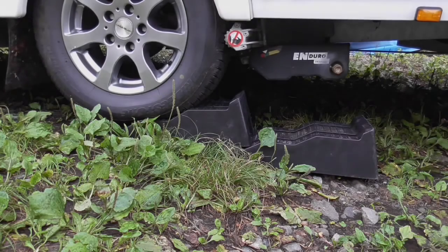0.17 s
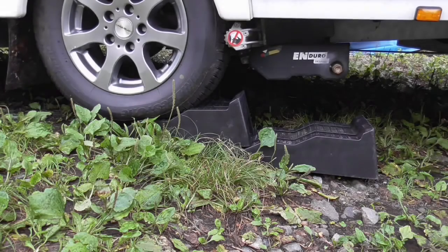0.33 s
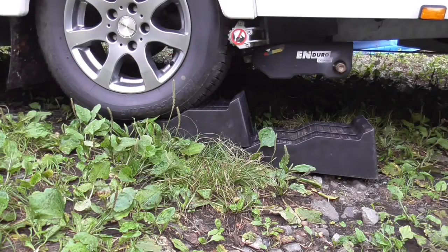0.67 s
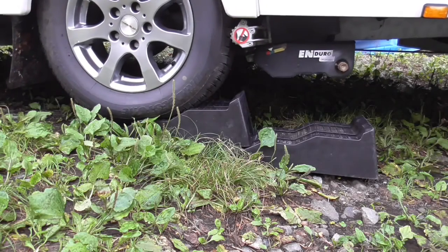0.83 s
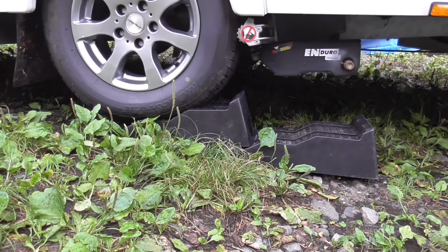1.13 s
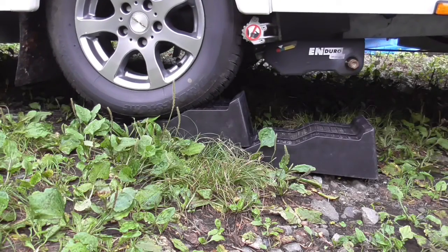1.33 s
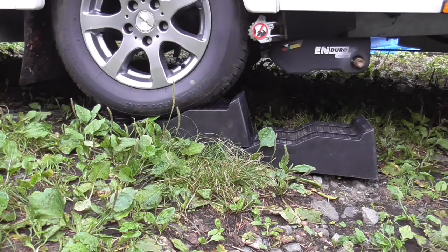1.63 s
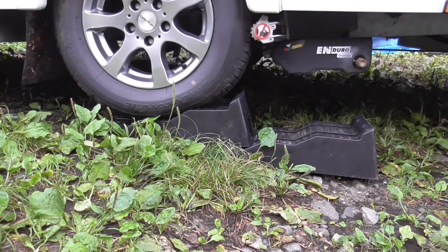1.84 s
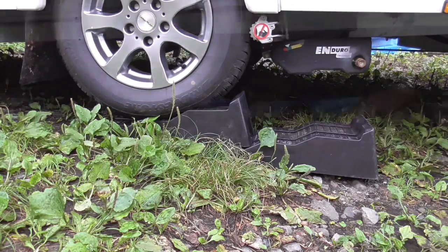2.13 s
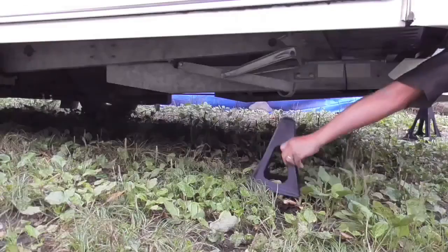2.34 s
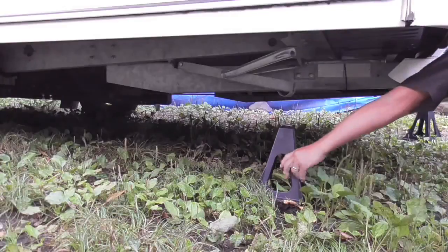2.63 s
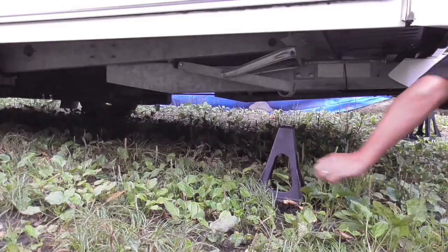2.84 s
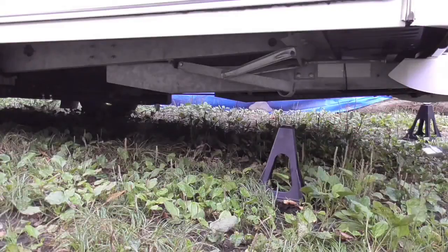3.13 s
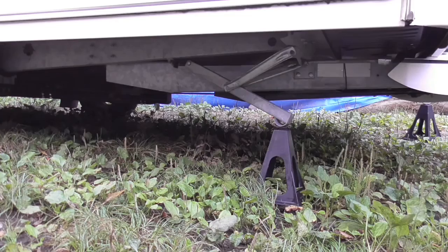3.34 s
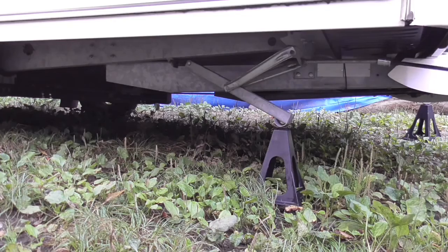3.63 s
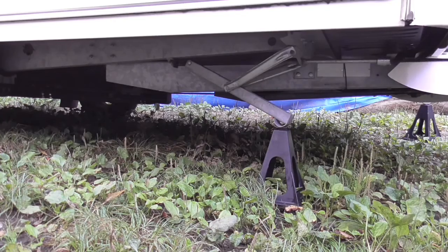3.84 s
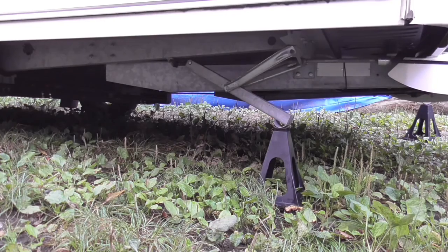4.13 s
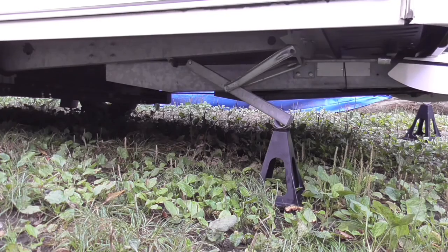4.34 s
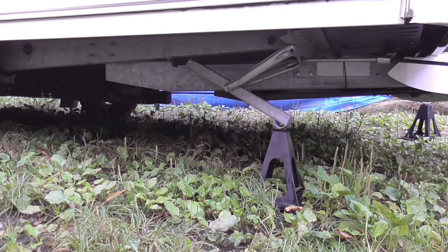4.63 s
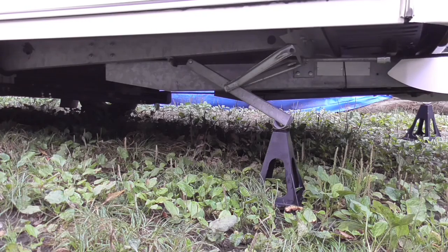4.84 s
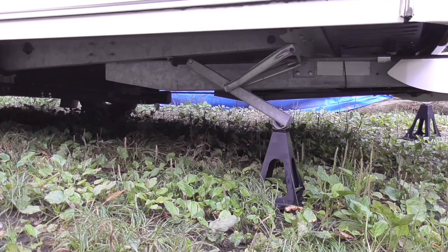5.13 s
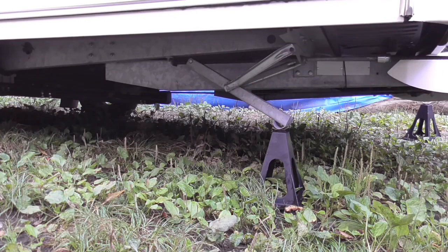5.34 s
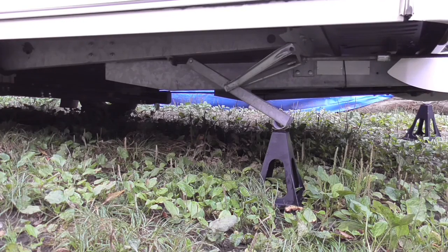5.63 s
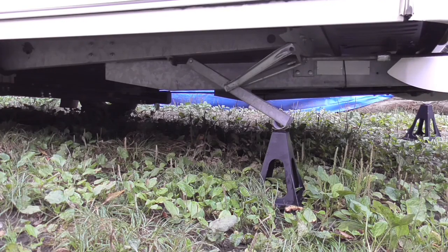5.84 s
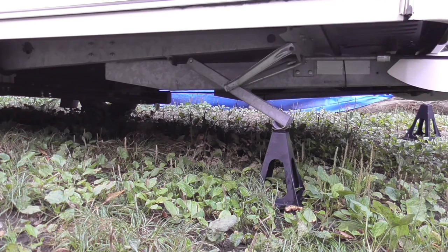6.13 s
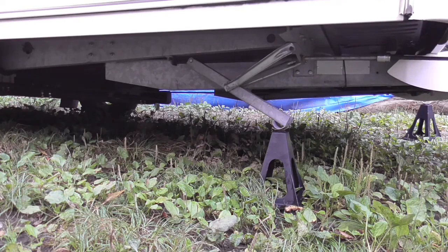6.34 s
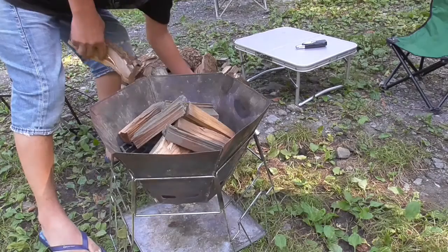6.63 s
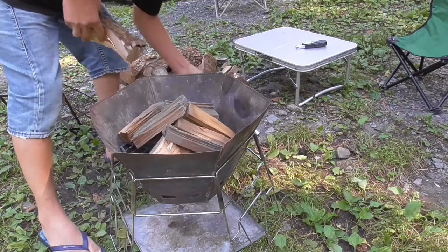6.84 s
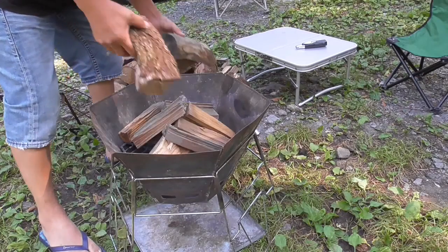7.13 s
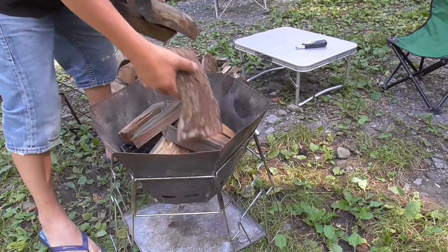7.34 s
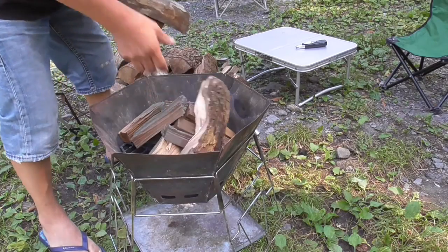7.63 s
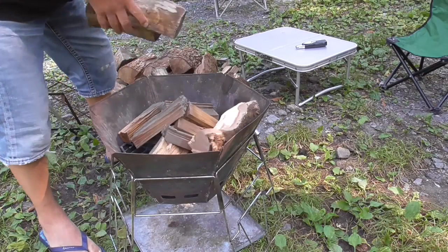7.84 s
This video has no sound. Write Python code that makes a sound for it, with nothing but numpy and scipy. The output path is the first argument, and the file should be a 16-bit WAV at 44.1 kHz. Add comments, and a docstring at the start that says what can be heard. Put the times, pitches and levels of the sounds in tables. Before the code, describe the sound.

Electric motors grind and whine, pulling a caravan up a ramp; a steel leg is cranked down, then logs knock under a buzzing cicada.

```python
"""Two electric mover motors grind a caravan up a ramp, one labouring, one speeding up and slowing.
A plastic stand snaps open; a steel corner leg knocks, groans and squeaks as it is screwed down on to it.
The body thumps and grit cracks under the load. Then a cicada buzzes its tymbals in the trees while
split logs are stacked in a sheet-metal fire bowl. Behind it all is a grassy campsite: distant water
and leaves, one faint bird note, late gusts."""
import sys
import numpy as np
from scipy import signal
from scipy.fft import rfft, irfft, next_fast_len
from scipy.io import wavfile
from scipy.ndimage import uniform_filter1d

SR = 44100
rng = np.random.default_rng(int(sys.argv[2]) if len(sys.argv) > 2 else 0)


def dump(signal):
    """Clip the signal to [-1, 1] and save it as 16-bit WAV at the path in sys.argv[1]."""
    limited = np.clip(np.atleast_2d(signal).T, -1, 1)
    pcm = np.round(limited * 32767).astype(np.int16)
    wavfile.write(sys.argv[1], SR, pcm)


N = 351477
T = np.arange(N) / SR

# Stereo image of near sources: freq_hz, correlation
NEAR_IMAGE = [(50, 0.64), (150, 0.75), (500, 0.84), (1500, 0.81), (3000, 0.81), (6000, 0.37), (14000, 0.6)]
# Speed of the free motor: time_s, mesh_hz
MESH_SPEED = [(.2, 420.4), (.5, 741.3), (.7, 895), (.85, 995), (1.0, 1079), (1.14, 1118), (1.22, 1087),
              (1.3, 948), (1.38, 785), (1.44, 660), (1.56, 465)]


def amp(db):
    """Decibels to gain."""
    return 10 ** (np.asarray(db) / 20)


def unit(x):
    """Scales to rms 1."""
    return x / np.sqrt(np.mean(x ** 2) + 1e-20)


def over_hz(points, hz):
    """Reads a table on a log-frequency axis."""
    knots_hz, values = np.transpose(points)
    return np.interp(np.log(hz + 1), np.log(knots_hz + 1), values)


def track(rows):
    """A curve's columns, sample by sample."""
    time_s, *columns = np.transpose(rows)
    return [np.interp(T, time_s, column) for column in columns]


def gate(start_s, end_s, fade_s=0.089):
    """1 from start to end, with linear fades outside."""
    return np.clip((T - start_s) / fade_s + 1, 0, 1) * np.clip((end_s - T) / fade_s + 1, 0, 1)


def swell(start_s, hold_s, rise_db_per_s, fall_db_per_s):
    """A gain that reaches 1 at start, holds and dies away."""
    before_db = rise_db_per_s * np.maximum(start_s - T, 0)
    after_db = fall_db_per_s * np.maximum(T - start_s - hold_s, 0)
    return amp(-np.minimum(before_db + after_db, 200))


def wander(rate_hz):
    """Random drift of rms 1, up to the given rate."""
    size = next_fast_len(N, real=True)
    hz = np.fft.rfftfreq(size, 1 / SR)
    return unit(irfft(rfft(rng.standard_normal(size)) / (1 + (hz / rate_hz) ** 4), size)[:N])


def colour(x, spectrum):
    """Applies a spectrum, rolled off above its last row; rms 1."""
    size = next_fast_len(x.shape[-1])
    hz = np.fft.rfftfreq(size, 1 / SR)
    rolloff = 1 / (1 + (hz / (1.3 * spectrum[-1][0])) ** 8)
    return unit(irfft(rfft(x, size) * rolloff * amp(over_hz(spectrum, hz)), size)[..., :x.shape[-1]])


def noise(spectrum, image=NEAR_IMAGE, size=N):
    """Stereo noise from a spectrum (freq_hz, density_db) and an image (freq_hz, correlation)."""
    full = next_fast_len(size)
    mid, side = rfft(rng.standard_normal((2, full)))
    correlation = np.clip(over_hz(image, np.fft.rfftfreq(full, 1 / SR)), -1, 1)
    mid, side = mid * np.sqrt(1 + correlation), side * np.sqrt(1 - correlation)
    return colour(irfft(np.array([mid + side, mid - side]), full)[:, :size], spectrum)


def rubbed(modes):
    """Resonances (freq_hz, width_hz, level_db) kept ringing by random rubbing."""
    out = 0
    for hz, width_hz, db in modes:
        pole = np.exp(-np.pi * width_hz / SR)
        envelope = rng.standard_normal((N, 2)) @ [1, 1j]
        for _ in range(2):
            envelope = signal.lfilter([1 - pole], [1, -pole], envelope)
        out += amp(db) * unit((envelope * np.exp(2j * np.pi * hz * T)).real)
    return out


def pan(left_db):
    """Stereo gains, left over right."""
    return amp([[left_db / 2], [-left_db / 2]])


def add(mix, start_s, sound):
    """Mixes a sound in place."""
    part = mix[:, round(start_s * SR):][:, :sound.shape[1]]
    part += sound[:, :part.shape[1]]


def blows(hits, modes, spectrum, t60s_s, ring_db, tail_db, rise_s, contact_db):
    """Each blow rings an object's modes and a dense wash, in three bands: thud, clack, crack."""
    t = np.arange(SR // 3) / SR
    edges_hz = [(60, 450), (450, 2000), (2000, 15000)]
    bands = [signal.butter(3, edges, "band", fs=SR, output="sos") for edges in edges_hz]
    onset = t < .025
    since_s = np.maximum(t - 3 * rise_s, 0)
    attack = np.exp(np.minimum(t / rise_s - 3, 0) * 0.94)  # softens the attack of each blow
    contacts = [1, 1, 1 + amp(contact_db) * np.exp(-since_s / 0.00031)]  # hard contact: treble only
    out = np.zeros((2, N))
    for start_s, *levels_db in hits:
        ring = 0
        for (hz, db, t60_s), (spread, detune, flip) in zip(modes, rng.standard_normal((len(modes), 3))):
            phase = 2 * np.pi * hz * (1 + 0.011 * detune) * t + np.pi * (flip > 0)
            ring += amp(db + 2 * spread - 60 * since_s / t60_s) * np.sin(phase)
        wash = noise(spectrum, size=len(t))
        for band, db, t60_s, contact in zip(bands, levels_db, t60s_s, contacts):
            fade = contact * amp(-60 * since_s / t60_s) + amp(tail_db - 60 * since_s / 0.5)
            part = signal.sosfilt(band, attack * (wash * fade + amp(ring_db) * ring))
            add(out, start_s - 3 * rise_s, amp(db) * part / np.sqrt(np.mean(part[:, onset] ** 2)))
    return out


def outdoors():
    """A steady wash of distant water and leaves; gusts bump the microphone."""
    air_spectrum = [(15, -62), (25, -17), (69, -17), (84, -11.5), (107, -8.5), (169, -8.5), (193, -3),
                    (322, -3), (445, -8), (495, -5.5), (582, -7), (1200, -9), (1750, -18.5), (8350, -21),
                    (15500, -32)]  # freq_hz, density_db
    air_image = [(60, 0.81), (150, 0.89), (380, 0.78), (950, 0.59), (2380, 0.51), (5980, 0.21),
                 (15000, -0.16)]  # freq_hz, correlation
    gusts = [(6.147, 0.024, -27), (6.25, 0.12, -39.5), (6.385, 0.026, -32), (6.491, 0.12, -42.5),
             (6.92, 0.18, -49), (7.19, 0.08, -39.5), (7.44, 0.052, -51), (7.72, 0.13, -47)]  # start_s, hold_s, level_db
    gust_spectrum = [(15, -48), (25, -17), (65, 3), (114, 4), (176, 2.5), (264, -9), (299, -7.5),
                     (424, -15.5), (700, -22.5), (910, -54), (1540, -120)]  # freq_hz, density_db
    air_db, breeze_db = -49, -52
    air = amp(air_db + 0.5 * wander(11)) * noise(air_spectrum, air_image)
    wind = amp(breeze_db) + sum(amp(db) * swell(s, hold_s, 398, 289) for s, hold_s, db in gusts)
    buffet = unit(noise(gust_spectrum, image=[(50, 0.027), (300, 0.12)]) * amp(2 * wander(30)))
    return air + pan(0.46) * wind * buffet * gate(6.11, 8)


def bird():
    """One far whistle that falls and levels off."""
    start_s, settle_s, end_hz, drop_hz = 2.995, .028, 4900, 342
    since_s = np.maximum(T - start_s, -settle_s)
    hz = (end_hz + drop_hz * np.exp(-since_s / settle_s)) * (1 + 0.0028 * wander(120))
    whistle = unit(np.sin(2 * np.pi * np.cumsum(hz) / SR))
    return amp(-62.5) * whistle * swell(start_s, .04, rise_db_per_s=330, fall_db_per_s=500)


def cicada():
    """Tymbal ribs buckle in even, rasping strokes that make a comb of tones; others sing further off."""
    tone_spectrum = [(5700, -22), (6100, -9), (6300, 0), (6520, 0), (6900, -7), (7200, -13), (7450, -13),
                     (7800, -25)]  # freq_hz, harmonic_db
    body_spectrum = [(2500, -24), (3500, -24), (4500, -16.5), (5500, -9.5), (6000, -3.5), (6380, -1),
                     (6800, -7.5), (7500, -4), (8500, -11), (10000, -19.5), (11000, -26), (14000, -31)]  # freq_hz, density_db
    start_s, tymbal_hz, throb_hz = 6.14, 101.7, 8.1
    phase = 2 * np.pi * np.cumsum(tymbal_hz * (1 + .0015 * wander(13.97))) / SR
    burst = np.exp(.3 * np.cos(phase)) * (1 + .25 * np.cos(4 * phase) + .2 * np.cos(5 * phase))
    singing, tone = T > start_s - .2, np.zeros(N)
    knots_s = np.arange(0, 8.2, .11)
    for k in range(56, 77):
        sway, shift = rng.standard_normal((2, len(knots_s)))  # moving leaves vary each harmonic
        level_db = over_hz(tone_spectrum, k * tymbal_hz) + 4.5 * np.interp(T[singing], knots_s, sway)
        drift_turns = np.interp(T[singing], knots_s, np.cumsum(shift) / 10)
        tone[singing] += amp(level_db) * np.cos(k * phase[singing] + 2 * np.pi * drift_turns)
    tone[singing] = unit(tone[singing])
    rasp = noise([(hz, 1.7 * db) for hz, db in body_spectrum])
    near = (.78 * tone + .4 * rasp) * unit(burst * amp(2 * wander(45)))
    chorus = noise(body_spectrum, image=[(3000, 1.0), (9000, 0.022)]) * amp(2 * wander(34))
    song = (near + .6 * chorus) * gate(start_s, 8, fade_s=0.097)
    throb_db = -0.1 * np.cos(2 * np.pi * throb_hz * (T - 6.2))
    return pan(-0.21) * amp(-36 + throb_db) * song


def firewood():
    """Logs knock together and on the bowl; one is pushed ever harder over crunching bark until it seats."""
    hits = [(6.285, -69, -52, -56), (6.326, -64, -47.5, -50), (6.955, -78, -53, -65),
            (7.194, -37, -28.5, -29.5), (7.199, -35.5, -30, -28.5), (7.213, -46, -38, -35),
            (7.24, -37, -37.5, -41), (7.268, -43.5, -41.5, -53), (7.412, -46, -36.5, -37.5),
            (7.491, -44, -36.5, -41.5), (7.566, -32, -46, -43), (7.592, -33, -38.5, -40),
            (7.619, -46, -39.5, -44), (7.638, -45, -48, -47), (7.858, -54, -72, -39)]  # start_s, thud_db, clack_db, crack_db
    log_modes = [(272, -9.5, 0.16), (445, -0.5, 0.076), (551, -3, 0.22), (844, -2, 0.11), (923, -6, 0.072),
                 (1182, 0, 0.06), (1300, -1, 0.03), (1524, 2, 0.037), (2110, -7.5, 0.042), (4110, -4, 0.06)]  # freq_hz, level_db, t60_s
    log_spectrum = [(80, -32), (260, -26), (480, -6.5), (900, -9), (1500, -18.5), (2800, -18), (4200, -18),
                    (7000, -10.5), (10500, -14), (15000, -28)]  # freq_hz, density_db
    bark_spectrum = [(120, -9), (300, -0.5), (520, 6), (1000, -0.5), (2200, -15), (5000, -13.5),
                     (14000, -26)]
    grains_per_s, grain_s, seated_s = 450, .003, 7.6
    slips = (rng.random(N) < grains_per_s / SR) * amp(2.5 * np.minimum(rng.exponential(1, N), 3))
    crunch = 1 + signal.lfilter([1], [1, -np.exp(-1 / (grain_s * SR))], slips)
    scrape = unit(noise(bark_spectrum) * crunch)
    push = swell(seated_s, 0, rise_db_per_s=29, fall_db_per_s=82) * gate(7.44, 8, fade_s=0.024)
    knocks = blows(hits, log_modes, log_spectrum, t60s_s=[.13, .12, .09],
                   ring_db=-5.5, tail_db=-14, rise_s=.0012, contact_db=-53)
    return pan(-0.75) * (knocks + amp(-37) * push * scrape)


def grit():
    """Small stones split under the loaded stand in bright ticks."""
    cracks = [(4.539, -38.5), (4.863, -37.5), (5.1416, -33.5), (5.339, -47)]  # start_s, level_db
    stone_spectrum = [(300, 5), (1200, 6), (2800, -3.5), (5000, -1.5), (7200, 3.5), (9300, 1), (11800, 2),
                      (13000, -5), (15000, -16)]  # freq_hz, density_db
    bursts = sum(amp(db) * swell(s, 0, rise_db_per_s=4000, fall_db_per_s=1100) for s, db in cracks)
    return pan(-1.4) * bursts * noise(stone_spectrum)


def screw_squeaks():
    """The dry thread sticks and slips in shrill notes, mostly faint and hoarse."""
    squeaks = [(3.22, 0.027, 3580, -57, .5, -14), (3.268, 0.039, 2850, -57, .25, -15),
               (3.43, 0.22, 3350, -62, .5, -20), (4.34, 0.064, 4060, -56, 0.5, -17),
               (4.544, 0.0077, 3030, -35.5, 0.06, -0.5)]  # start_s, hold_s, pitch_hz, level_db, roughness, overtones_db
    jitter, out = wander(385), 0
    for start_s, hold_s, hz, db, roughness, overtones_db in squeaks:
        phase = 2 * np.pi * np.cumsum(hz * (1 + (.006 + .05 * roughness) * jitter)) / SR
        overtones = amp(-1) * np.sin(2 * phase) + amp(7) * np.sin(3 * phase)
        tone = np.sin(phase) + amp(overtones_db) * overtones
        out += amp(db) * tone * swell(start_s, hold_s, rise_db_per_s=2500, fall_db_per_s=1050)
    return pan(-4.5) * out


def frame_groans():
    """The loaded frame gives short, low, unsteady notes as the screw sticks and slips."""
    groans = [(3.148, .02, 281, -47), (3.19, 0.022, 267.4, -36), (3.248, 0.011, 278, -36.5),
              (3.277, 0.051, 195, -43), (3.596, .012, 111, -36), (3.665, 0.016, 260.1, -32.5),
              (3.722, 0.068, 282, -39.5), (3.822, 0.011, 258, -30), (3.85, 0.047, 250.6, -39.5),
              (4.697, 0.0073, 124.6, -43), (5.43, 0.0069, 115, -38.5)]  # start_s, hold_s, pitch_hz, level_db
    unsteady_s = np.cumsum(1 + .05 * wander(70)) / SR
    out = 0
    for start_s, hold_s, hz, db in groans:
        phase = 2 * np.pi * (hz * unsteady_s + rng.random())
        tone = np.sin(phase) + amp(-20.5) * np.sin(2 * phase)
        out += amp(db) * tone * swell(start_s, hold_s, rise_db_per_s=900, fall_db_per_s=600)
    return np.sqrt(2) * out * amp(1.7 * wander(80))


def leg_screw():
    """The screw drones and scrapes with each crank stroke, softer at the stroke's ends."""
    strokes = [(3.233, 0.24, -44.5, -56.5), (3.52, 0.26, -44.5, -58), (3.792, 0.36, -49.5, -56),
               (4.327, 0.49, -74, -62.5), (4.665, 0.85, -55.5, -64), (5.39, 0.15, -47.5, -84)]  # middle_s, length_s, drone_db, scrape_db
    drone_modes = [(261.3, 83, -4.5), (433, 140, -11), (766, 100, -10.5), (101.7, 76, -8),
                   (1600, 31, -19)]
    scrape_spectrum = [(180, 5), (470, 11.5), (800, 10.5), (1400, 6), (2200, -1.5), (3000, -6),
                       (3700, 3.5), (4900, -7), (8000, -2.5), (15000, -15)]
    drone = amp(1.5 * wander(26)) * rubbed(drone_modes)
    scrape = noise(scrape_spectrum) * amp(2 * wander(36) + 7.5)
    out = 0
    for middle_s, length_s, drone_db, scrape_db in strokes:
        effort = amp(-7 * (2 * (T - middle_s) / length_s) ** 2)
        out += effort * (amp(drone_db) * drone + amp(scrape_db) * scrape)
    return out


def corner_leg():
    """The steel leg knocks, the lifted caravan body thumps, the crank handle clinks in its socket."""
    leg_hits = [(3.189, -51, -51, -50.5), (3.252, -38, -51, -67), (3.275, -46, -41.5, -66),
                (3.305, -46, -44, -71), (3.513, -42, -41.5, -58), (3.615, -29, -23.5, -24.5),
                (3.63, -31, -30.5, -39), (3.66, -34.5, -45, -67), (3.74, -52, -64, -54),
                (3.756, -41, -38.5, -47), (3.822, -38, -46.5, -64)]  # start_s, thud_db, clack_db, crack_db
    leg_modes = [(107, 0, 0.096), (247.7, -0.5, 0.19), (280.5, 0, 0.24), (430, -12, 0.088), (498, -5, 0.27),
                 (686, 5, 0.097), (1067, 8, 0.036), (1359, -1.5, 0.13), (1582, -6.5, 0.15),
                 (2390, -20, 0.065)]  # freq_hz, level_db, t60_s
    steel_spectrum = [(50, -20), (110, -16), (160, -13.5), (255, 0.5), (420, -3.5), (860, -9), (1590, -17),
                      (1900, -19), (3000, -34.5), (7500, -28.5), (11500, -33), (15000, -48)]  # freq_hz, density_db
    body_hits = [(4.083, -35, -28.5, -47.5), (4.101, -31, -37, -53), (4.497, -38, -39.5, -60),
                 (4.508, -32, -39.5, -57), (4.644, -35, -54, -70), (4.908, -44, -47, -54),
                 (5.097, -29, -32.5, -49), (5.425, -44.5, -64, -75)]  # start_s, thud_db, clack_db, crack_db
    body_modes = [(115, -4.5, 0.21), (152.5, 1.5, 0.12), (201, 0, 0.14), (303.4, 2, 0.11),
                  (415, -0.5, 0.052), (594, -8, 0.28), (725, 4, 0.12), (1044, 7, .06), (1363, 0, 0.086)]  # freq_hz, level_db, t60_s
    body_spectrum = [(50, -12), (110, -26), (170, 2.5), (300, -16), (650, 3.5), (1300, -6), (1900, -27),
                     (5000, -35), (14000, -46)]  # freq_hz, density_db
    handle_hits = [(4.366, -50, -47, -64), (5.531, -47, -43.5, -53)]  # start_s, thud_db, clack_db, crack_db
    handle_modes = [(290, -5, 0.29), (972, 5, 0.058), (1237, 1, 0.052), (2190, -15, 0.079),
                    (2620, -17, 0.082)]  # freq_hz, level_db, t60_s
    knocks = blows(leg_hits, leg_modes, steel_spectrum, t60s_s=[.1, .08, .05],
                   ring_db=-9, tail_db=-32, rise_s=.001, contact_db=-17)
    thumps = blows(body_hits, body_modes, body_spectrum, t60s_s=[.09, .06, .05],
                   ring_db=-12.5, tail_db=-23, rise_s=.00086, contact_db=-17)
    clinks = blows(handle_hits, handle_modes, steel_spectrum, t60s_s=[.08, .07, .06],
                   ring_db=10, tail_db=-30, rise_s=.0016, contact_db=-17)
    return pan(-0.55) * (knocks + clinks) + thumps


def plastic_stand():
    """The stand slides with a faint hiss and snaps open."""
    slides = [(1.929, -55), (2.11, -50.5)]  # peak_s, level_db
    hits = [(2.1595, -35, -32, -24), (2.176, -42, -35, -44), (2.216, -65, -40.5, -66)]  # start_s, thud_db, clack_db, crack_db
    plastic_modes = [(699, -1, 0.15), (1070, -8, 0.057), (1420, -13, 0.052), (2244, -8, 0.073),
                     (4100, -7, 0.077), (6270, 3, 0.026), (7560, -2, 0.046), (12500, 8, 0.025)]  # freq_hz, level_db, t60_s
    plastic_spectrum = [(47, -53), (80, -31), (493, -41), (699, -1), (1410, -10.5), (1570, -27),
                        (2230, -14), (2900, -21), (3860, -13), (10600, -3.5), (15000, -15)]  # freq_hz, density_db
    push = sum(amp(db) * swell(s, 0, rise_db_per_s=172, fall_db_per_s=200) for s, db in slides)
    hiss = push * noise([(2000, -29), (4500, -1), (7500, 0), (12000, -6), (15000, -15)])
    snaps = blows(hits, plastic_modes, plastic_spectrum, t60s_s=[.08, .07, .07],
                  ring_db=-7, tail_db=-38, rise_s=.0005, contact_db=6)
    return hiss * gate(1.93, 2.13) + pan(-0.62) * snaps


def free_motor():
    """Shaft hum and brush hiss grow with speed; gear whine glides through the housing's resonances."""
    hum_orders = [(1, -11), (3, 0), (4, -3), (5, 0), (7, -3), (9, -2), (11, -5)]  # shaft_multiple, level_db
    whine_orders = [(16, -33.5), (32, -38), (48, -49.5), (51, -54), (60, -56), (63, -54), (72, -51)]  # gear mesh and sidebands: shaft_multiple, level_db
    housing_response = [(400, -26), (620, -1), (770, -6), (860, -10), (940, -5.5), (1060, -17),
                        (1120, -4.5), (1230, -3), (1350, -7), (1520, -4.5), (1700, -13), (1860, 0),
                        (2090, -15), (2230, -3), (2600, -4), (3000, -15), (3320, -7), (4500, -15)]  # freq_hz, gain_db
    brush_spectrum = [(410, -8.5), (700, -2.5), (827, -7), (928, -6.5), (1250, -4), (1720, -16.5),
                      (1810, -12), (2220, -13.5), (2340, -20), (2940, -21), (3260, -18), (6110, -21.5),
                      (7800, -15.5), (15000, -30)]  # freq_hz, density_db
    teeth, clean_hz, slack_span_hz = 16, 1130, 500
    mesh_hz, = track(MESH_SPEED)
    octaves = np.log2(mesh_hz / mesh_hz.max())
    turns = np.cumsum(mesh_hz / teeth * (1 + 0.0018 * wander(44))) / SR
    hum = sum(amp(db + 2.6 * wander(5.8)) * np.cos(2 * np.pi * (k * turns + rng.random()))
              for k, db in hum_orders)
    hum = amp(-42 + 16 * octaves) * unit(hum)
    slack = np.clip((clean_hz - mesh_hz) / slack_span_hz, .14, .9)  # backlash smears the slow whine
    whine = 0
    for k, db in whine_orders:
        rattle = (wander(110) + 1j * wander(110)) / np.sqrt(2)
        smear = np.sqrt(1 - slack) + np.sqrt(slack) * rattle
        brighten_db = (k / teeth - 1.5) * 7.5 * octaves
        level_db = db + over_hz(housing_response, k / teeth * mesh_hz) + brighten_db + 1.8 * wander(24)
        whine += amp(level_db) * np.sqrt(2) * (smear * np.exp(2j * np.pi * k * turns)).real
    coasting = uniform_filter1d(1. * (np.gradient(mesh_hz) < 0), size=SR // 6)
    brushes = unit(noise(brush_spectrum) * amp(1.5 * wander(150)))
    housing = rubbed([(2550, 78, -13.5), (3270, 79, -18), (4430, 970, -10), (7740, 130, -20)])
    hiss = amp(-47.5 + 4 * octaves) * (amp(6.5) * brushes + housing)
    return (hum + amp(-3 * coasting) * whine + hiss) * gate(0.32, 1.36, fade_s=0.29)


def labouring_motor():
    """Shaft orders flutter under load; the teeth grind twice a turn, whine and ring the gear case."""
    shaft_speed = [(0, 56.56), (1.11, 56.26), (1.2, 57.3), (1.55, 57.37)]  # time_s, shaft_hz
    shaft_orders = [(1, -12), (2, -6), (3, -6.5), (4, 3), (5, -5.5), (6, -2), (7, -9.5), (8, -4), (9, -2.5),
                    (10, -2.5), (11, 1), (12, -8.5), (13, -13)]  # shaft_multiple, level_db
    surges = [(0.218, 0.021, 4.5), (0.287, .04, 0.5), (.99, .04, -3), (1.535, 0.027, 0)]  # tyre gripping the ramp: middle_s, width_s, gain_db
    grind_spectrum = [(18, -53), (30, -11), (80, -29), (107, -25), (189, -3), (223, 1), (303, -10),
                      (336, 6), (421, -13.5), (634, 1), (844, -15), (1250, -18.5), (1440, -16), (4000, -51),
                      (5200, -76), (8800, -120)]  # freq_hz, density_db
    gear_whine = [(0, 1228, -49), (.11, 1239, -43), (.21, 1222, -73), (.28, 1234, -47), (.34, 1224, -59),
                  (.385, 1215, -36), (.48, 1233, -51), (.55, 1230, -45), (.66, 1238, -59),
                  (.85, 1235, -47.5), (1.1, 1230, -52), (1.26, 1225, -46.5), (1.32, 1225, -55),
                  (1.43, 1206, -44), (1.55, 1222, -49)]  # time_s, pitch_hz, level_db
    case_modes = [(634, 17, -53), (746, 6.1, -51), (1227, 21, -51.5)]  # freq_hz, width_hz, level_db
    stop_s, growl_t60_s, ring_t60_s = 1.55, 0.18, 0.79
    free_mesh_hz, = track(MESH_SPEED)
    shaft_hz, = track(shaft_speed)
    gear_hz, gear_db = track(gear_whine)
    ease_db = 4.5 * np.log2(free_mesh_hz / free_mesh_hz[0])  # softer as the free motor speeds up
    strain_db = 4 * np.exp(-np.maximum(stop_s - T, 0) / 0.063)
    surge_db = sum(db * np.exp(-((T - s) / width_s) ** 2) for s, width_s, db in surges)
    level_db = -30 - ease_db + strain_db + surge_db + .7 * wander(35)
    turns = np.cumsum(shaft_hz * (1 + .004 * wander(15))) / SR
    orders = 0
    for k, db in shaft_orders:
        gain = amp(db + 2.6 * wander(10.4))
        drift_turns = 0.25 * rng.standard_normal() + .05 * wander(17.4)
        orders += gain * np.cos(2 * np.pi * (k * turns + drift_turns))
    bite = 1 + 0.76 * np.cos(4 * np.pi * turns)
    grind = unit(noise(grind_spectrum) * bite * amp(3.7 * wander(23)))
    stopped_s = np.maximum(T - stop_s, 0)
    growl = amp(level_db - 60 * stopped_s / growl_t60_s) * (unit(orders) + amp(-7.5) * grind)
    swing_db = level_db - level_db[T < stop_s].mean()
    case = rubbed(case_modes) * amp(0.18 * swing_db)
    whine = amp(gear_db + 1.7 * wander(51)) * np.sqrt(2) * np.sin(2 * np.pi * np.cumsum(gear_hz) / SR)
    return growl + (case + whine) * amp(-60 * stopped_s / ring_t60_s)


def scene():
    """Caravan, firewood and campsite in stereo."""
    motors = labouring_motor() + free_motor()
    propping = plastic_stand() + leg_screw() + corner_leg() + frame_groans() + screw_squeaks() + grit()
    return motors + propping + firewood() + bird() + cicada() + outdoors()


def record(dry):
    """Low-pass at 15.5 kHz."""
    lowpass = signal.firwin(401, 15500, window=("kaiser", 9), fs=SR)
    return signal.oaconvolve(dry, lowpass[None], "same", axes=1)


dry = scene()
out = record(dry)
dump(out)
```